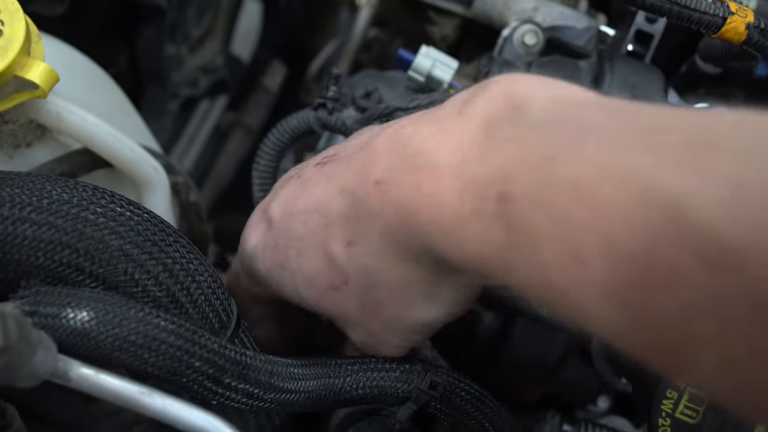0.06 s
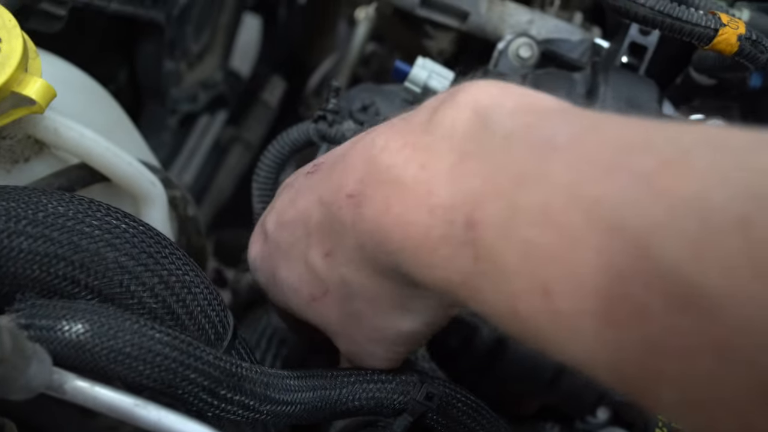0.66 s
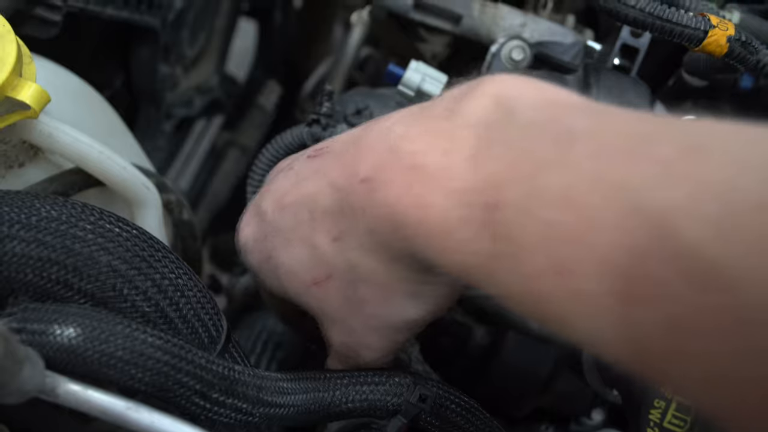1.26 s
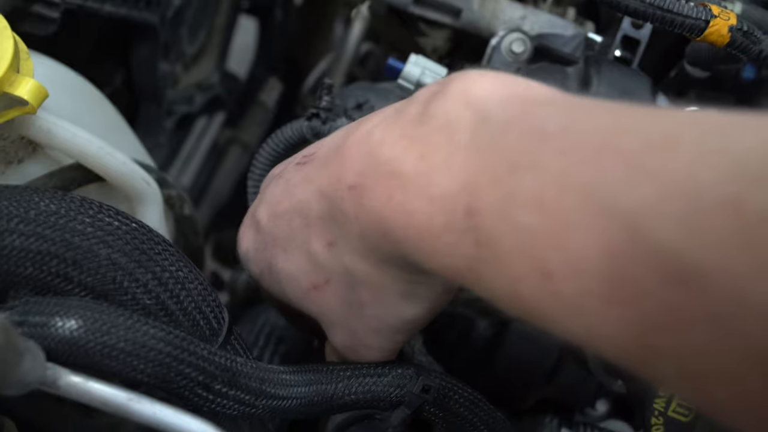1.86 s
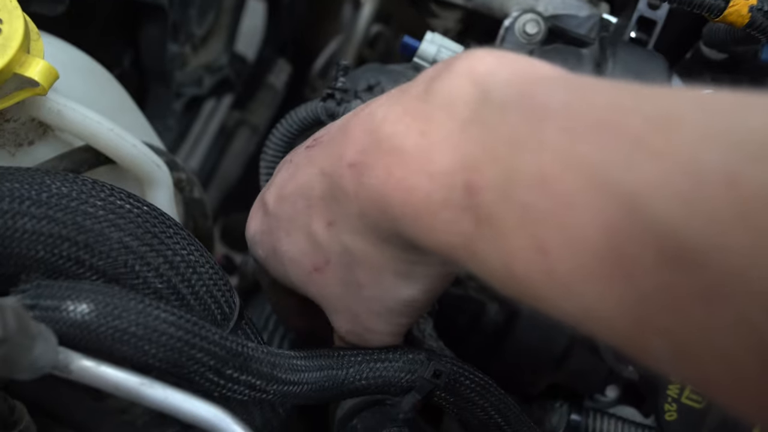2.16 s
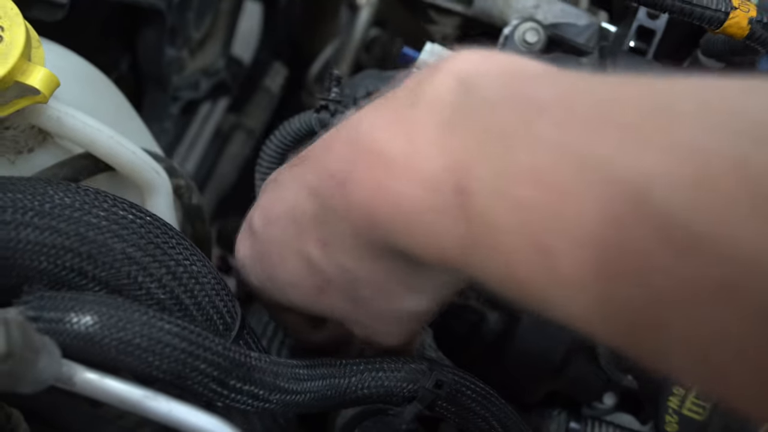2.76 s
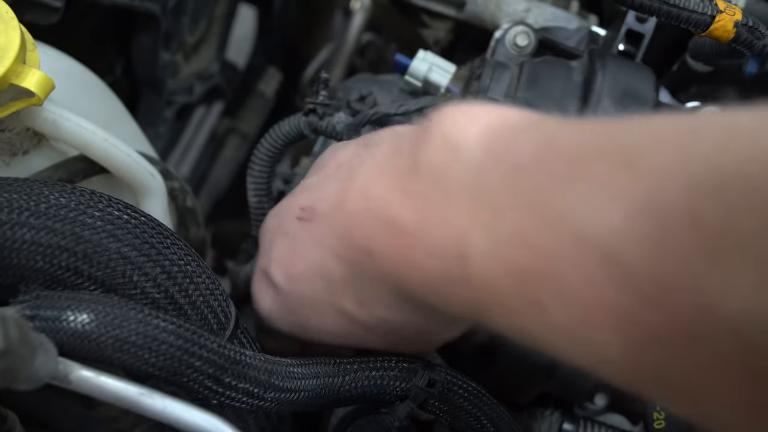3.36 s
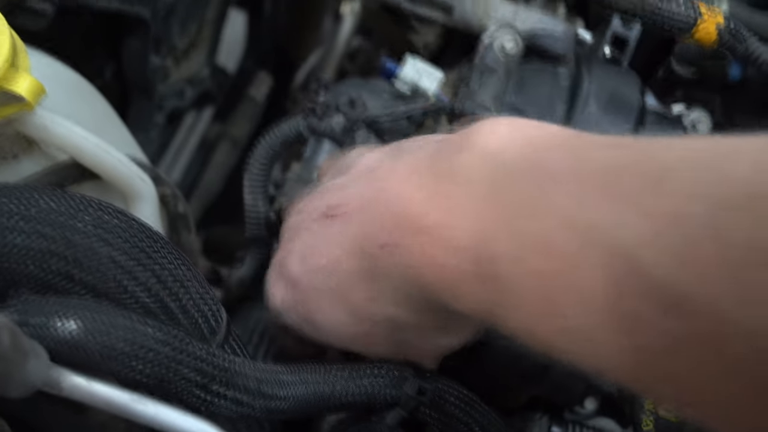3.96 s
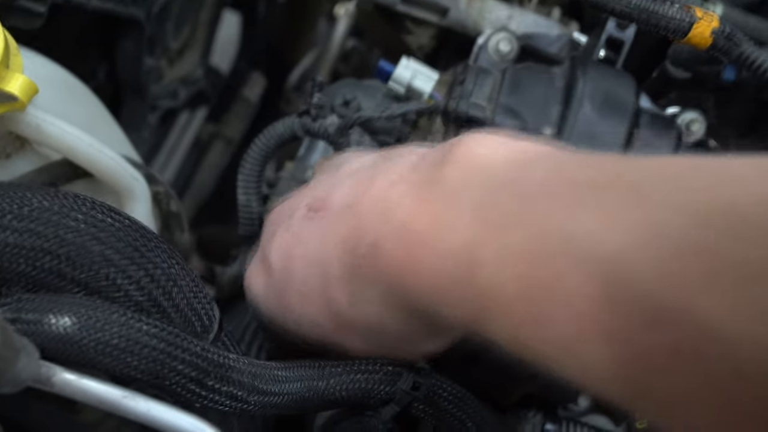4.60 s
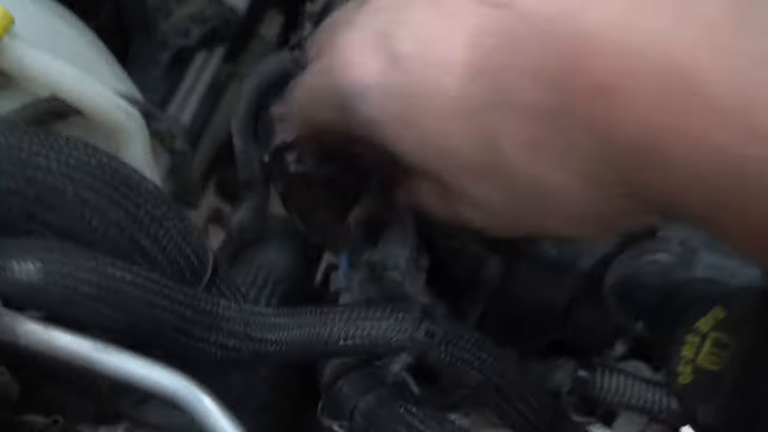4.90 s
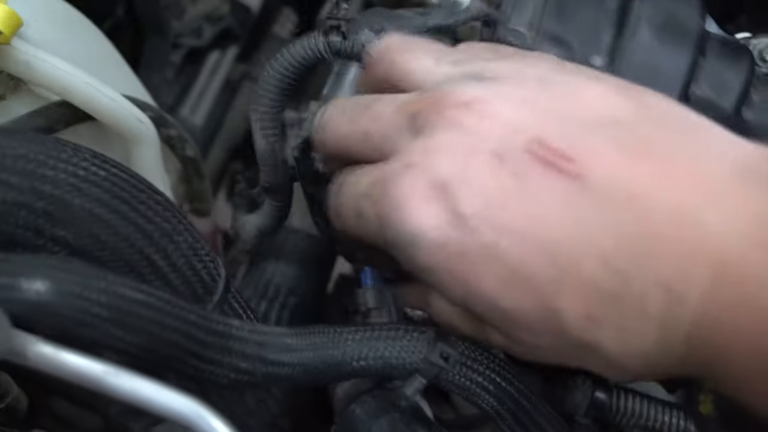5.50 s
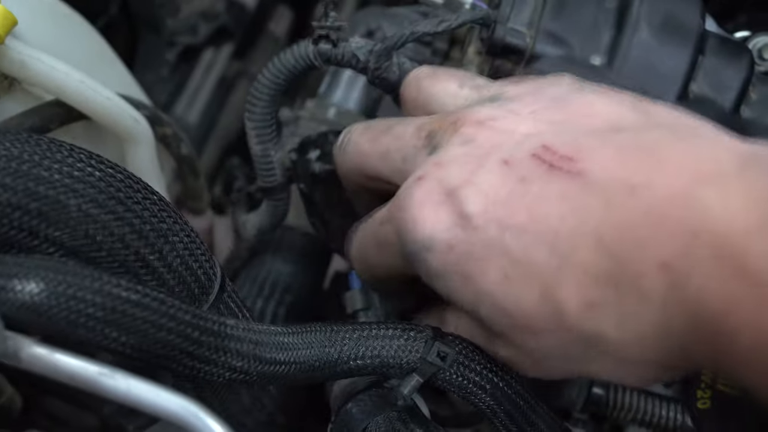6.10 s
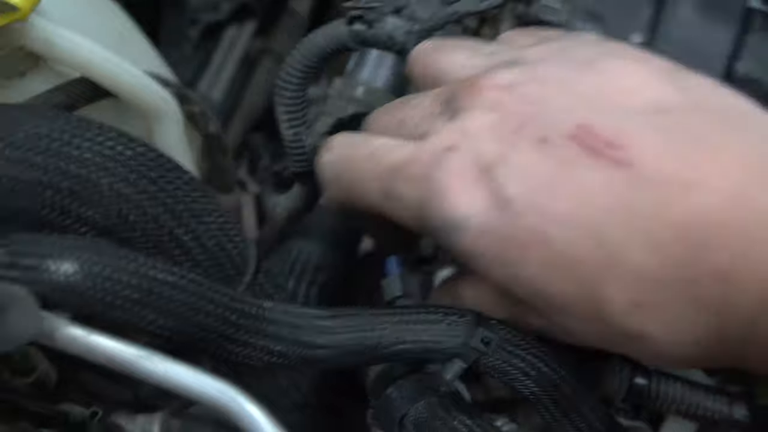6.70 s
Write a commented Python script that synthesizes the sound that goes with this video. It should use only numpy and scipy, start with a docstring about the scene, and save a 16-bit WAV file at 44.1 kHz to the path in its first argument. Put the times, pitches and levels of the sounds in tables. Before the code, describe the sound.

Close to the microphone, a hand works a plastic connector in the bay of a stopped engine. Fingers rasp on ribbed sleeving in short strokes, with faint creaks and scattered clicks. The clicks grow louder and rubber hoses bump dully. The plug jerks free with a sharp snap, then knocks and scrapes on a briefly ringing metal fitting as a latch snaps. Workshop ventilation rumbles softly throughout.

```python
"""In a workshop, at the bay of a stopped engine, one mono microphone close to the hand.
The hand works a plastic connector and its wiring loose: fingers rub ribbed sleeving in tiny slips,
plastic creaks, shells click, a latch snaps and rubber hoses bump. The plug jerks free, then knocks
and scrapes on a metal fitting, which rings. The crowded bay scatters the clicks and the room answers
faintly; further off, ventilation rumbles and hums."""
import sys
import numpy as np
from scipy import signal
from scipy.fft import rfft, irfft, next_fast_len
from scipy.io import wavfile
from scipy.ndimage import uniform_filter1d

SR = 44100
rng = np.random.default_rng(int(sys.argv[2]) if len(sys.argv) > 2 else 0)


def waveform_to_disk(signal):
    """Save audio, clipped to [-1, 1], as 16-bit WAV at the path in sys.argv[1]."""
    frames = np.transpose(np.atleast_2d(signal))
    scaled = np.clip(frames, -1, 1) * 32767
    samples = np.round(scaled).astype(np.int16)
    wavfile.write(sys.argv[1], SR, samples)


N = 297586
TIME = np.arange(N) / SR
RING_TIME = np.arange(SR // 5) / SR  # time axis of one short ring, s

# ventilation spectrum: f/Hz, level/dB
VENT_TONE = [(12, -47), (20, -0.5), (70, -0.5), (146, -5.5), (216, -10.5), (270, -15), (301, -14.5),
             (399, -19), (434, -19.5), (624, -23.5), (1030, -26.5), (1150, -29), (3840, -31.5),
             (4540, -38.5), (16000, -45.5)]
# partials of the workshop hum: f/Hz, level/dB
HUM_PARTIALS = [(59, -52.5), (119, -51.5), (178, -56), (213, -53.5), (296, -65)]
# soft bumps of hand and hoses: t/s, peak/dB, f/Hz, t60/s
HOSE_BUMPS = [(2.901, -27, 99, 0.05), (3.403, -23, 60.3, 0.39), (3.4509, -16.5, 110, 0.11),
              (3.472, -17.5, 74, 0.1),  (4.47, -27.5, 92.3, .26), (4.774, -22.5, 133, 0.027),
              (4.93, -31.5, 231, .089), (5.275, -29, 140.4, 0.37), (6.455, -16, 202, 0.012)]
# creaks of plastic on rubber: start/s, end/s, level/dB, f/Hz
PLASTIC_CREAKS = [(.61, 0.616, -44.5, 2920), (.654, .68, -45, 2230), (0.773, .815, -45, 2220),
                  (1.655, 1.66, -35, 8250), (2.868, 2.908, -48, 2600), (3.711, 3.745, -41, 1430),
                  (4.736, 4.768, -41.5, 1680), (5.231, 5.33, -47, 1490), (5.503, 5.518, -34.5, 774)]
# friction spectra of ribbed sleeving, hollow parts and skin hiss: f/Hz, level/dB
RASP_TONE = [(1700, -20), (2500, -7.5), (3050, -1.5), (3500, 3.5), (4000, -8.5), (4800, -16), (7000, -31)]
BODY_TONE = [(200, 4.5), (600, -2.5), (1000, -7.5), (1550, 0), (1900, -4.5), (2300, -2.5), (3200, -28)]
HISS_TONE = [(3500, 0), (5000, 2.5), (6400, 0), (8400, -0.5), (10500, -6.5), (13000, -6.5), (15500, -13.5)]
# the hand shifting between strokes: t/s, rasp/dB
HAND_SHIFTS = [(0, -53.5), (1.1, -66), (2.3, -76), (2.45, -58), (2.7, -57), (2.98, -66), (3.3, -56),
               (3.85, -58.5), (3.98, -56), (4.6, -59), (5.3, -56), (5.7, -49.5), (6.0, -62.5),
               (6.16, -47.5), (6.27, -60), (6.75, -70)]
# finger strokes over sleeving: start/s, end/s, rasp/dB, body over rasp/dB, hiss over rasp/dB
FINGER_STROKES = [(0.029, 0.048, -34.5, -16, -5.5), (0.113, 0.212, -51.5, -27, -4),
                  (0.219, 0.293, -40.5, -35, -5), (0.516, .548, -52.5, -12, 2.5),
                  (0.608, 0.648, -40, -20, -1), (0.77, 0.802, -42.5, -16, -10),
                  (0.903, 0.946, -45.5, -10, -5), (1.396, 1.447, -53, -12, -11),
                  (1.747, 1.808, -51.5, -4.5, -4.5), (1.948, 1.974, -51.5, 2, 1.5),
                  (2.159, 2.179, -53, -12, 1.5), (2.338, 2.385, -45, -2.5, -4.5),
                  (2.557, 2.577, -45, 1, -2), (2.615, 2.629, -51, -17, 4), (2.73, 2.813, -41.5, -1.5, -7.5),
                  (2.873, 2.9, -38, -9, -8.5), (3.018, 3.055, -43.5, -13, -14), (3.122, 3.136, -44.5, 5, 1),
                  (3.167, 3.182, -39, 1.5, -3.5), (3.188, 3.221, -41.5, -22, -7),
                  (3.58, 3.652, -37, -6.5, -8), (3.675, 3.743, -40, -1.5, -13),
                  (4.049, 4.083, -37.5, -8, -8), (4.158, 4.2, -36.5, -8.5, -10),
                  (4.237, 4.285, -48.5, -8, -16), (4.35, 4.404, -44.5, -23, -17),
                  (4.71, 4.777, -42, -2.5, -3.5), (4.81, 4.865, -44, 0, .5), (4.937, 4.991, -45.5, 1, 6),
                  (5.052, 5.149, -51, 7, 1), (5.196, 5.215, -39, -3.5, 0), (5.228, 5.348, -47.5, -1, -21),
                  (5.702, 5.813, -59.5, -1, 11.5), (5.787, 5.917, -44.5, -6.5, 0.5),
                  (6.063, 6.113, -46.5, 2, 5.5), (6.3, 6.327, -45, -1.5, -7), (6.347, 6.407, -37, -8, -5),
                  (6.525, 6.56, -47, 4, 6), (6.699, 6.75, -42, -7, -6)]
# tugs on the wiring: start/s, giving way/s, final rasp/dB, body over rasp/dB, hiss over rasp/dB
WIRE_TUGS = [(1.644, 1.675, -37.5, -3.5, 1), (3.352, 3.484, -30.5, -6, -5.5), (5.31, 5.589, -33, -4, -3.5)]
# plug sliding on metal: start/s, end/s, level/dB, favoured f/Hz, its boost/dB
PLUG_SCRAPES = [(3.224, 3.236, -54, 8620, 25), (5.5066, 5.53, -33, 6250, 6), (5.538, 5.61, -41, 6300, 6.5),
                (6.15, 6.622, -56, 11740, 16), (6.217, 6.227, -56, 9700, 12), (6.303, 6.43, -48.5, 9800, 5),
                (6.492, 6.61, -46.5, 9700, 4), (6.676, 6.735, -47, 11740, 16)]
# plug knocking on the fitting, plug jerking free, latch snapping: t/s, peak/dB, contact/s
PLUG_KNOCKS = [(6.1017, -10, 0.000075), (6.112, -7.5, 0.000074), (6.1462, -22, 0.00023),
               (6.193, -23, 0.00016), (6.473, -5, .00012), (6.484, -2, 0.000046), (6.4877, -29, 0.000017),
               (6.606, -26.5, 0.00064)]
PLUG_JERKS = [(5.5973, -6, 0.000072), (5.6004, -9.5, 0.000042)]
LATCH_SNAPS = [(6.4437, -1.5, 0.000042), (6.4452, -26, 0.000045)]
# modes of the fitting (scraped, struck), plug body, latch and shell mount: f/Hz, level/dB, t60/s
SCRAPE_MODES = [(2170, -8, .08), (3160, 0, .1), (3440, -2, .08), (3860, -8, .06), (5710, -9, .08),
                (6330, -13, .1), (7880, -19, .1), (8640, -19, .1), (9690, -14, .09), (9790, -16, .09),
                (11740, -20, .08), (13300, -22, .05)]
FITTING_MODES = [(296, -22.5, 0.16), (534, -9, 0.052), (790, -41, 0.03), (1040, -17, 0.038),
                 (1088, 0.5, 0.031), (1236, 2, 0.053), (1320, 1, 0.021), (1413, 6.5, 0.031),
                 (1440, 6.5, 0.02), (1830, 2, 0.0083), (2141, 0, 0.11), (2380, -6, 0.036),
                 (2627, -3, 0.038), (3177, 7, 0.094), (3150, -27, 0.057), (5540, -11, 0.074),
                 (9950, -10, 0.33)]
PLUG_MODES = [(713, -11, 0.062), (947, -7.5, 0.037), (1166, -3, 0.078), (1367, -14.5, 0.11),
              (2148, 6, 0.083), (2230, -19, 0.037), (2500, -10, 0.031), (2740, -10, 0.028),
              (2845, -11, 0.031), (3220, -4, 0.042), (3300, 1, 0.036), (3500, 0, 0.027), (4280, -6, 0.038),
              (6600, -20, .03)]
LATCH_MODES = [(1420, -7.5, 0.0098), (1500, -19, 0.019), (2380, -2, 0.018), (3170, 0, 0.014),
               (3330, -3, 0.019), (3800, -2.5, 0.012), (4900, -2, 0.0073), (5710, -1, 0.017),
               (6500, -4, 0.0094), (7100, -4, 0.0095), (8240, 1, 0.012), (9640, 0, 0.0085),
               (12700, 3.5, 0.0081)]
MOUNT_MODES = [(168, -16.5, 0.079), (385, -23.5, 0.041), (532, -21, 0.052), (753, -24, 0.054),
               (1090, -30, 0.12)]
# spectra of the shell's hollow and of the loose parts around it: f/Hz, level/dB
HOLLOW_TONE = [(150, -4), (450, -29), (700, 6), (1150, -0.5), (1700, 7), (2100, -1.5), (4000, -19.5)]
SHELL_RATTLE_TONE = [(100, -2), (200, 0), (330, 5), (700, -1), (1600, -4), (2600, -12), (5000, -37)]
# shell clicks: t/s, ping peak/dB, f/Hz, hollow over ping/dB, crack over ping/dB
SHELL_CLICKS = [(.427, -37.5, 1310, 3.5, 2), (.558, -35.5, 1850, 0, -2), (1.668, -17.5, 8140, -30, -17),
                (1.676, -22.5, 4130, -11, 1), (2.131, -42.5, 6500, 8, 16.5), (2.385, -34, 1600, 2, 2),
                (2.585, -23, 6950, -8, 6), (2.812, -40.5, 3270, 6, 9), (2.862, -38.5, 2240, 5, -19),
                (3.446, -11.5, 1540, -17, 1), (3.468, -16, 3260, -1, -8), (3.4745, -19, 3500, -3, 7),
                (3.496, -25.5, 3800, -10, 4), (3.5781, -7.5, 3300, -12.5, -31), (3.801, -12, 3260, 1, -19),
                (3.988, -18.5, 3100, 4.5, -7), (4.141, -25, 1950, 0.5, 6.5), (4.174, -19, 3540, -20, -10),
                (4.253, -34, 3580, 8, 7), (4.304, -37, 3500, -16, 9.5), (4.785, -20.5, 1430, -18, 8.5),
                (4.7949, -8.5, 3580, -16, -3), (4.803, -13, 3460, -9.5, -7), (5.344, -29, 7060, -20, 5.5),
                (5.4825, -16, 3450, -25, -12), (5.563, -21, 1660, -10, -14), (5.574, -25, 2900, 11.5, -11),
                (5.5973, -1.5, 2650, -12, -29), (5.6232, -18, 6200, -37, -3), (6.033, -25, 8100, -28, -8),
                (6.2317, -24.5, 3920, -23, -14), (6.297, -30, 2870, -20, -6), (6.368, -20, 3470, -8, -1),
                (6.7445, -23, 6630, -14, 1)]
# spectrum of the fitting's loose mount: f/Hz, level/dB
CLATTER_TONE = [(150, -3), (500, -12), (750, -8), (1200, 10.5), (1800, -12), (2600, -4.5),
                (4500, -24), (14000, -32)]
# spectra of reflections under the palm, in the bay and in the room: f/Hz, level/dB
PALM_TONE = [(200, 0), (4000, 0), (16000, -3)]
BAY_TONE = [(200, 0), (1500, 0), (3500, -2), (8000, -3), (16000, -6)]
ROOM_TONE = [(200, -2), (1300, 0), (3000, -5), (6000, -7), (16000, -12)]


def undb(db):
    """Decibels to gain."""
    return 10 ** (np.asarray(db) / 20)


def unit_rms(x):
    """Scale to rms 1."""
    return x / np.sqrt(np.mean(x ** 2))


def unit_peak(x):
    """Scale to peak 1."""
    return x / np.abs(x).max()


def rise(t, rise_s):
    """Exponential onset from 0 towards 1."""
    return 1 - np.exp(-t / rise_s)


def fade(t, t60):
    """Exponential decay, 60 dB down after t60."""
    return np.exp(-np.log(1000) * t / t60)


def add(out, start_s, x):
    """Mix x into out from start_s on."""
    i = int(start_s * SR)
    out[i:i + len(x)] += x[:N - i]


def through(x, response):
    """Pass a sound through an impulse response."""
    return signal.fftconvolve(x, response)[:len(x)]


def gains(tone, size):
    """Spectrum points joined on a log-frequency axis."""
    hz, db = np.transpose(tone)
    bins_hz = np.fft.rfftfreq(size, 1 / SR)
    return undb(np.interp(np.log(bins_hz + 1), np.log(hz), db))


def colour(x, tone):
    """Give a signal a spectrum, at rms 1."""
    size = next_fast_len(len(x), True)
    return unit_rms(irfft(rfft(x, size) * gains(tone, size), size)[:len(x)])


def tap(tone):
    """Shortest causal (minimum-phase) response with this spectrum."""
    size = len(RING_TIME)
    cepstrum = irfft(np.log(gains(tone, size)), size)
    cepstrum[1:size // 2] *= 2
    cepstrum[size // 2 + 1:] = 0
    return unit_peak(irfft(np.exp(rfft(cepstrum)), size))


def resonance(hz, t60, rise_s):
    """One damped swing that takes a moment to build, at peak 1."""
    swing = np.sin(2 * np.pi * hz * RING_TIME)
    return unit_peak(swing * rise(RING_TIME, rise_s) ** 2 * fade(RING_TIME, t60))


def ring(modes):
    """Damped modes struck together; the swing takes a moment to spread through the part."""
    swings = sum(undb(db) * np.sin(2 * np.pi * hz * RING_TIME) * fade(RING_TIME, t60)
                 for hz, db, t60 in modes)
    return swings * rise(RING_TIME, 0.00067)


def wander(rate):
    """Random drift, spread near 1, turning rate times a second."""
    knots = rng.standard_normal(4096)
    return np.interp(TIME * rate, np.arange(len(knots)), knots)


def slips(size, rate, spread_db, smooth):
    """Stick-slip: tiny uneven slips, rate a second, over smooth sliding noise."""
    sizes = undb(spread_db * np.minimum(rng.standard_normal(size), 2))
    signs = rng.choice([-1, 1], size)
    slipping = rng.random(size) < rate / SR
    return unit_rms(unit_rms(sizes * signs * slipping) + smooth * rng.standard_normal(size))


def stroke(length_s, grip_s, release_s, swell_db=0):
    """Pressure of one stroke: it builds, swells by swell_db to its middle and lets go."""
    t = np.arange(int((length_s + 0.1) * SR)) / SR
    arch = np.sin(np.pi * np.minimum(t / length_s, 1))
    return rise(t, grip_s) * undb(swell_db * (arch - 1)) * fade(np.maximum(t - length_s, 0), release_s)


def tug(length_s, mount_db=17.5, release_s=0.066):
    """Pressure of one tug: it mounts ever more slowly, then the part gives."""
    t = np.arange(int((length_s + 0.2) * SR)) / SR
    slack = np.maximum(1 - t / length_s, 0)
    release = fade(np.maximum(t - length_s, 0), release_s)
    return undb(-mount_db * slack ** 1.62) * rise(t, 0.012) * release


def workshop():
    """Well behind the engine: ventilation rumble with a wavering hum."""
    air = colour(rng.standard_normal(N), VENT_TONE) * undb(-40.5 + 0.67 * wander(rate=1.9))
    hum = np.zeros(N)
    for hz, db in HUM_PARTIALS:
        level = undb(db + 2.36 * wander(rate=5))
        hum += level * unit_rms(np.sin(2 * np.pi * hz * TIME + 0.7 * wander(rate=5)))
    return air + hum


def reflections(x, db, t60, delay_s, tone):
    """Diffuse reflections reach the microphone after a delay and die away."""
    t = np.arange(SR // 2) / SR
    onset = np.clip(t / delay_s - 1, 0, 1)
    tail = colour(rng.standard_normal(len(t)), tone) * fade(t, t60) * onset
    return undb(db) * through(x, tail / np.linalg.norm(tail))


def hose_bumps():
    """Rubber hoses give way with a dull, damped swing; knocks on the fitting rock them too."""
    out = np.zeros(N)
    for start, db, hz, t60 in HOSE_BUMPS:
        add(out, start, undb(db) * resonance(hz, t60, rise_s=0.00046))
    for start, db, _ in PLUG_KNOCKS:
        add(out, start, undb(db - 30) * resonance(hz=119, t60=0.092, rise_s=0.0028))
    return out


def plastic_creaks():
    """Uneven slips on rubber keep one hollow resonance of the plastic going."""
    out = np.zeros(N)
    for start, end, db, hz in PLASTIC_CREAKS:
        pressure = stroke(end - start, grip_s=0.003, release_s=0.086)
        grit = slips(len(pressure), rate=700, spread_db=2, smooth=0.15)
        creak = through(grit, resonance(hz, t60=0.0062, rise_s=0.00018))
        add(out, start, undb(db) * pressure * unit_rms(creak))
    return out


def loom_crackle(rubs):
    """The flexed wiring loom crackles faintly around each stroke, and its ribs tick."""
    flex = np.sqrt(np.abs(uniform_filter1d(rubs ** 2, int(0.07 * SR))))  # running rms of the rubbing
    crackle = unit_rms(through(slips(N, rate=350, spread_db=4.5, smooth=0.64), tap(HISS_TONE)))
    rib_noise = colour(rng.standard_normal(len(RING_TIME)), HISS_TONE) * fade(RING_TIME, t60=0.006)
    rib = unit_peak(rib_noise) + resonance(hz=3500, t60=0.006, rise_s=0.0002) / 2
    ticks = unit_rms(through(slips(N, rate=70, spread_db=3, smooth=0), rib))
    return flex * (undb(-22) * crackle + undb(-14.5) * ticks)


def friction(pressure, body_db, hiss_db):
    """Sliding skin rasps the ribbed sleeving, stirs the hollow parts and hisses under the palm."""
    tilt_db = 0.49 * (hiss_db + 5.0)  # per octave: a quick, hissy stroke reaches higher
    hiss_tone = [(hz, db + tilt_db * np.log2(hz / 7000)) for hz, db in HISS_TONE]
    sliding = np.zeros(len(pressure))
    for share_db, tone in ((0, RASP_TONE), (body_db, BODY_TONE), (hiss_db, hiss_tone)):
        spot_tone = [(hz, db + 0.97 * rng.standard_normal()) for hz, db in tone]  # no two spots alike
        grit = slips(len(pressure), rate=2200, spread_db=2.5, smooth=0.66)
        sliding += undb(share_db) * colour(grit, spot_tone)
    rub = pressure * sliding
    return rub + reflections(rub, db=-8, t60=0.018, delay_s=0.0004, tone=PALM_TONE)


def finger_rubs():
    """Strokes and tugs over the faint, uneven friction of the shifting hand."""
    shifting_db = np.interp(TIME, *np.transpose(HAND_SHIFTS)) + 3.4 * wander(rate=18)
    out = friction(undb(shifting_db), body_db=3, hiss_db=-4.5)
    for start, end, db, body_db, hiss_db in FINGER_STROKES:
        length_s = end - start
        pressure = stroke(length_s, grip_s=0.0006 + 0.042 * length_s, release_s=0.046, swell_db=3.5)
        add(out, start, friction(undb(db) * pressure, body_db, hiss_db))
    for start, end, db, body_db, hiss_db in WIRE_TUGS:
        add(out, start, friction(undb(db) * tug(end - start), body_db, hiss_db))
    catching = undb(3.2 * wander(rate=130) - 0.26)
    return catching * out


def plug_scrapes(landing_db=11.5, settle_s=0.16):
    """Sliding contact keeps the fitting's high modes singing; each contact point favours a few."""
    out = np.zeros(N)
    for start, end, db, favoured_hz, boost_db in PLUG_SCRAPES:
        metal = ring([(hz, mode_db + boost_db * np.exp(-(np.log(hz / favoured_hz) / 0.094) ** 2), t60)
                      for hz, mode_db, t60 in SCRAPE_MODES])
        pressure = stroke(end - start, grip_s=0.00047, release_s=0.011)
        t = np.arange(len(pressure)) / SR
        bite = undb(landing_db * fade(t, settle_s))  # hardest as the plug lands
        grit = slips(len(t), rate=3300, spread_db=13.5, smooth=0.33)
        add(out, start, undb(db) * through(pressure * bite * grit, metal / np.linalg.norm(metal)))
    return out


def mount_clatter():
    """Loose parts of the fitting's mount rattle briefly after each knock."""
    out = np.zeros(N)
    envelope = rise(RING_TIME, 0.0018) * fade(RING_TIME, t60=0.082)
    for start, db, _ in PLUG_KNOCKS:
        rattle = colour(slips(len(RING_TIME), rate=1300, spread_db=6.5, smooth=0.7), CLATTER_TONE)
        add(out, start, undb(db - 12.5) * rattle * envelope)
    return out


def strikes(blows, modes):
    """Blows on the latch, plug or fitting; a longer contact leaves the high modes quiet."""
    out, response = np.zeros(N), ring(modes)
    for start, db, contact_s in blows:
        force = RING_TIME * np.exp(-RING_TIME / contact_s)
        add(out, start, undb(db) * unit_peak(through(response, force)))
    return out


def shell_clicks(ring_cycles=13.2, halving_db=28):
    """Close up: a damped plastic ping, the hollow shell on its mount, a gritty crack and a rattle."""
    out = np.zeros(N)
    hollow = tap(HOLLOW_TONE) + ring(MOUNT_MODES)
    crack_envelope = rise(RING_TIME, 0.0015) * fade(RING_TIME, t60=0.011)
    rattle_envelope = rise(RING_TIME, 0.0032) * fade(RING_TIME, t60=0.13)
    for start, db, hz, hollow_db, crack_db in SHELL_CLICKS:
        # a -15 dB ping lasts ring_cycles; a firmer grip is louder and damps it sooner
        t60 = ring_cycles / hz * 2 ** (-(db + 15) / halving_db)
        ping = resonance(hz, t60, rise_s=0.00015)
        crack = crack_envelope * colour(rng.standard_normal(len(RING_TIME)), HISS_TONE)
        click = undb(db) * (ping + undb(hollow_db) * hollow + undb(crack_db) * crack)
        add(out, start, click)
        add(out, start + rng.uniform(0.00171, 0.003), 0.41 * click)  # echo off the nearest engine part
        rattle = colour(slips(len(RING_TIME), rate=1200, spread_db=4, smooth=0.5), SHELL_RATTLE_TONE)
        add(out, start, undb(db + hollow_db - 20) * rattle * rattle_envelope)
    return out


def scene():
    """At the microphone, alike in both channels: close handling, its reflections, the workshop behind."""
    plastic = shell_clicks() + strikes(LATCH_SNAPS, LATCH_MODES)
    knocks = strikes(PLUG_KNOCKS, FITTING_MODES) + mount_clatter()
    jerks = strikes(PLUG_JERKS, PLUG_MODES)
    rubs = finger_rubs()
    wiring = rubs + loom_crackle(rubs)
    bay = reflections(plastic, db=-10, t60=0.055, delay_s=0.001, tone=BAY_TONE)
    close = plastic + knocks + jerks + bay + wiring + plastic_creaks() + plug_scrapes() + hose_bumps()
    room = reflections(close, db=-24, t60=0.42, delay_s=0.012, tone=ROOM_TONE)
    return np.tile(close + room + workshop(), (2, 1))


def record(dry):
    """The recorder clips at full scale and cuts the top above 16 kHz."""
    lowpass = signal.ellip(10, 0.2, 80, 16000, fs=SR, output="sos")
    return signal.sosfilt(lowpass, np.clip(dry, -1, 1))


dry = scene()
out = record(dry)
waveform_to_disk(out)
```